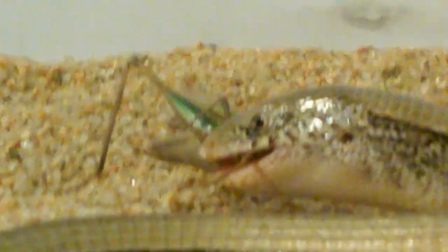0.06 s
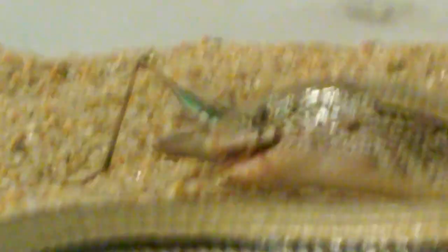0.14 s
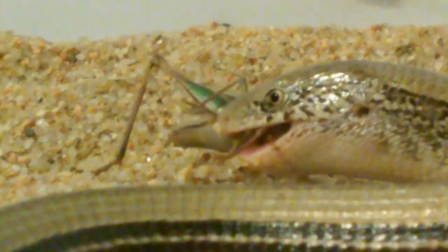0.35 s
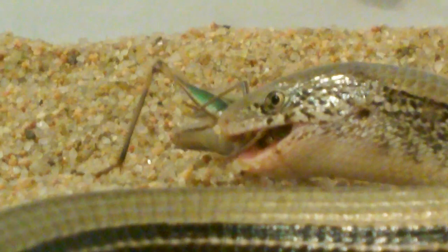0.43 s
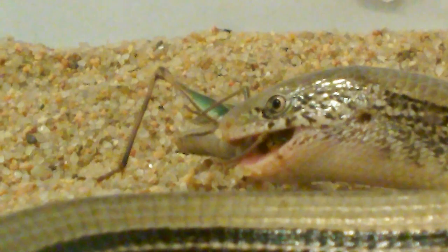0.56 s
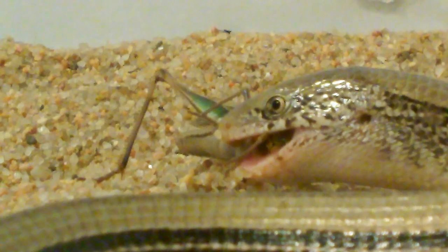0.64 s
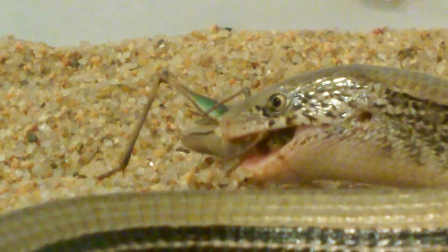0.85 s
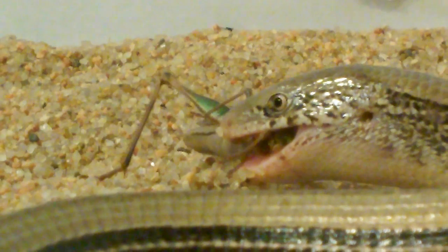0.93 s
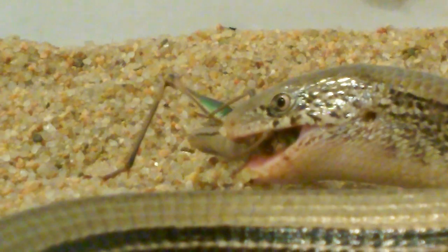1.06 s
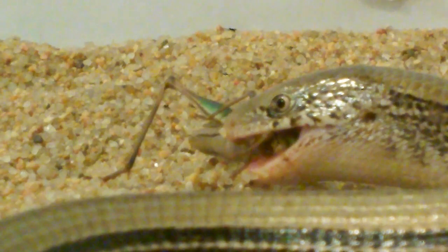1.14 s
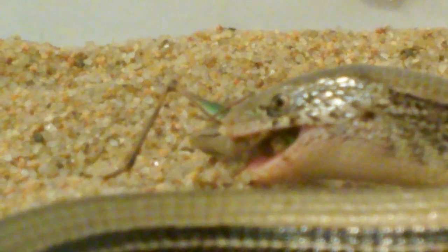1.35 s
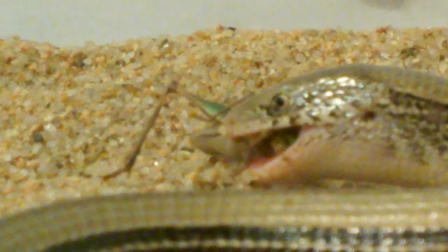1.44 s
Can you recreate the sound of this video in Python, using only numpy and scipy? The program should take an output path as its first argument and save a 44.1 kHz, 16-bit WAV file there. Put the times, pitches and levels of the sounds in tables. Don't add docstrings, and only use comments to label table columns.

```python
import sys
import numpy as np
from scipy import signal
from scipy.fft import rfft, irfft
from scipy.io import wavfile
from scipy.ndimage import uniform_filter1d

SR = 44100
rng = np.random.default_rng(int(sys.argv[2]) if len(sys.argv) > 2 else 0)


def rack_gain(trim_db):
    fader = np.asarray(trim_db, float)
    return 10 ** (fader / 20)


def waveform_to_disk(signal):
    frames = np.transpose(np.atleast_2d(signal))
    scaled = np.clip(frames, -1, 1) * 32767
    samples = np.round(scaled).astype(np.int16)
    wavfile.write(sys.argv[1], SR, samples)


N = 66150

# (time [s], level [dB])
SCRAPE_FORCE = [
    (.2285, -53.5),
    (.2295, -25.5),
    (.236, -17.5),
    (.245, -11.5),
    (.268, -9.5),
    (.29, -16),
    (.299, -30.5),
    (.3015, -51.5),
]
# (frequency [Hz], level [dB])
SCRAPE_COLOUR = [(20, -22.5), (70, -14), (125, -8), (400, -13), (480, -17), (620, -13), (1500, -14.5),
                 (5000, -24.5), (16000, -41)]
# (frequency [Hz], width [Hz], level [dB])
SCRAPE_RING = [(136.54, 38, 8), (176.5, 13, -2.5), (266, 57, -4), (398, 50, -3), (603.5, 90, -7.5)]


def scrape():
    body = coloured(grit(), SCRAPE_COLOUR)
    ring = sum(rack_gain(db) * resonate(body, hz, width) for hz, width, db in SCRAPE_RING)
    s, db = np.transpose(SCRAPE_FORCE)
    force = np.interp(np.arange(N) / SR, s, db, left=-140, right=-140)
    return evened(body + ring) * rack_gain(force)


# (frequency [Hz], width [Hz], level [dB])
SHELL = [(570, 250, 5), (1076, 240, 8.5), (2080, 580, 6.5), (3730, 800, 4.5)]
# (frequency [Hz], level [dB], decay t60 [s])
TANK = [(293, -5.5, 0.16), (361, 4.5, 0.03), (428.8, -1.5, .09), (540, -8, 0.16), (677, -6.5, 0.11),
        (920, -12, .13), (1240, -7.5, 0.065)]


def snap(crack_db, bright_db, share, gap_ms):
    k = np.arange(8000) - 8
    second = share * np.sinc(k - gap_ms * SR / 1000) * (abs(k) < 60)
    click = np.sinc(k) + second
    shell = rack_gain(bright_db - 2) * resonate(click, 7720, 6900)
    for i, (hz, width, db) in enumerate(SHELL):
        shell = shell + (-1) ** i * rack_gain(db) * resonate(click, hz, width)
    tank = 0
    for hz, db, t60 in TANK:
        uneven_db = 3.5 * rng.standard_normal()
        tank = tank + knock(db - 28.5 + uneven_db, hz, t60)[:len(k)]
    return rack_gain(crack_db) * (shell / abs(shell).max() + tank)


SNAP_S = [.0772, .1744, .1851, .559, .6503, .7214, .9477, .9648]
# (crack level [dB], brightness [dB], share of the second break [ratio])
SNAPS = [
    (-29, -0.5, .3),
    (-41, 3, 0.14),
    (-37, -0.5, .6),
    (-47, 9, 0.33),
    (-42.5, 1.5, 0.0047),
    (-24.5, 0.5, 0.79),
    (-27.5, -9.5, 0.22),
    (-26, -5, .85),
]
BREAK_GAP_MS = [.32, .39, .9, .3, .16, .039, .125, .68]


def shell_snaps():
    track = np.zeros(N)
    for s, row, gap_ms in zip(SNAP_S, SNAPS, BREAK_GAP_MS):
        add(track, s, snap(*row, gap_ms))
    return track


THUMP_S = [.078, .0785, .0795, .175, .186, .651, .722, .7235, .9483, .9488, .9657, .9668, .972]
# (pitch [Hz], level [dB], decay t60 [s])
THUMPS = [(491, -38.5, 0.022), (172, -49.5, .06), (350, -53.5, 0.18), (606.5, -45, .02), (120, -40, 0.026),
          (250, -70, .025), (233, -28.5, 0.031), (144, -42.5, 0.022), (2230, -31.5, 0.0059),
          (158, -25.5, 0.021), (1020, -25, 0.0093), (219, -32, 0.015), (460, -59.5, 0.074)]


def tank_thumps():
    track = np.zeros(N)
    for s, (hz, db, t60) in zip(THUMP_S, THUMPS):
        add(track, s, knock(db, hz, t60))
    return track


# (time [s], length [s], level [dB], edge [s], grain pitch [ratio])
STROKES = [
    (0.087, 0.026, -67.5, 0.01, 0.27),
    (0.104, .022, -68.5, 0.017, 1.3),
    (0.198, 0.024, -55.5, 0.019, 1.1),
    (0.314, 0.039, -43.5, 0.013, 0.87),
    (0.37, 0.081, -45, 0.022, 0.95),
    (0.491, 0.074, -71, 0.044, 1.05),
    (0.648, 0.039, -61, 0.039, 0.85),
    (0.978, .02, -70.5, 0.058, 0.34),
    (1.116, 0.03, -84, .02, 0.9),
    (1.272, .015, -80.5, .01, 0.53),
]


def drag():
    gains = [stroke_pressure(*stroke[:4]) for stroke in STROKES]
    grains = grit()
    rubbing = sum(gain * grainy_rub(grains, stroke[-1]) for gain, stroke in zip(gains, STROKES))
    patchy = rack_gain(1.4 * wander(200))
    low = evened(resonate(resonate(rng.standard_normal(N), 55, 120), 55, 200))
    fizz = evened(signal.lfilter(*signal.butter(2, 5970, "high", fs=SR), rng.standard_normal(N)))
    push_db = 20 * np.log10(sum(gains) + 1e-5)
    rumble_db = -23 + 0.75 * linger(push_db, fall_db_per_s=200.5)
    fizz_db = -32 + 0.7 * linger(push_db, fall_db_per_s=109)
    return patchy * rubbing + rack_gain(rumble_db) * low + rack_gain(fizz_db) * fizz


def stroke_pressure(start, length, db, edge):
    t = np.arange(N) / SR
    outside = np.minimum(np.minimum(t - start, start + length - t), 0)
    return rack_gain(db + 20 * outside / edge)


# (frequency [Hz], width [Hz], level [dB])
RUB = [(397, 330, 5.5), (1077.7, 600, 1), (1550, 600, -4), (2070, 700, 1.5), (2870, 590, -9.5),
       (3900, 970, -17.5)]


def grainy_rub(grains, pitch):
    bed = 0
    for i, (hz, width, db) in enumerate(RUB):
        once = resonate(grains, hz * pitch, width * pitch)
        bed = bed + (-1) ** i * rack_gain(db) * resonate(once, hz * pitch, width * pitch)
    return evened(signal.lfilter(*signal.butter(2, 8700 * pitch, fs=SR), bed))


# (time [s], level [dB], pitch [Hz], decay t60 [s])
KNOCKS = [(0.2, -24, 115, 0.01), (0.208, -39, 76, 0.12), (.224, -25.5, 85, 0.011), (0.2, -42, 140, .035),
          (.45, -37, 51, 0.036), (.538, -65, 47, 0.05), (0.48, -62.5, 176, 0.015),
          (0.587, -52.5, 1580, 0.022), (.585, -50, 600, 0.025), (.728, -63, 150, 0.082),
          (0.71, -63, 172, 0.31), (1.156, -71.5, 355, 0.16), (.975, -53.5, 380, 0.14),
          (0.46, -52.5, 171, 0.11), (.558, -52, 73, .06), (0.79, -58, 93, .08), (0.96, -67, 85, 0.11),
          (1.27, -73, 1300, .015), (0.597, -65, 82, .05), (1.041, -60.5, 360, 0.039),
          (1.059, -51, 820, 0.012), (1.077, -51.5, 800, 0.01), (1.156, -56, 823, 0.011)]


def dull_knocks():
    track = np.zeros(N)
    for s, db, hz, t60 in KNOCKS:
        add(track, s, knock(db, hz, t60))
    return track


# (frequency [Hz], level [dB])
HISS_COLOUR = [(25, -13.5), (70, -10), (140, -20), (330, -12), (700, -14.5), (1200, -19), (4000, -22.5),
               (16000, -23)]
# (frequency [Hz], level [dB rms])
HUM = [(177.6, -78), (242.2, -78.5), (301.5, -96), (419.9, -97), (538.3, -98.5), (721.4, -101.5)]


def room():
    t = np.arange(N) / SR
    hum = 0
    for hz, db in HUM:
        waver = rack_gain(1.5 * wander(3000) - 5)
        hum = hum + np.sqrt(2) * rack_gain(db) * waver * np.sin(2 * np.pi * (hz * t + rng.random()))
    return rack_gain(-76.5) * coloured(rng.standard_normal(N), HISS_COLOUR) + hum


def grit():
    size = rack_gain(2.5 * np.minimum(rng.exponential(1, N), 4))
    return evened(size * rng.standard_normal(N) * (rng.random(N) < 14000 / SR))


def knock(db, hz, t60):
    t = np.arange(0, .2, 1 / SR)
    rise = 1 - np.exp(-t / 0.00024)
    return rack_gain(db - 60 * t / t60) * rise * np.sin(2 * np.pi * hz * t)


def linger(db, fall_db_per_s):
    fall = np.arange(N) * fall_db_per_s / SR
    return np.maximum.accumulate(db + fall) - fall


def wander(size):
    return evened(uniform_filter1d(rng.standard_normal(N), size=size))


def poles(hz, width):
    r = np.exp(-np.pi * abs(width) / SR)
    return np.array([1, -2 * r * np.cos(2 * np.pi * hz / SR), r * r])


def resonate(x, hz, width):
    a = poles(hz, width)
    return signal.lfilter(np.array([1, 0, -1]) * (1 - a[2]) / 2, a, x)


def coloured(x, points):
    f, db = np.transpose(points)
    hz = np.fft.rfftfreq(len(x), 1 / SR)
    gain = rack_gain(np.interp(np.log(hz + 1), np.log(f + 1), db))
    return evened(irfft(rfft(x) * gain, len(x)))


def evened(x):
    return x / np.sqrt(np.mean(x ** 2) + 1e-20)


def add(mix, s, sound):
    part = mix[round(s * SR):][:len(sound)]
    part += sound[:len(part)]


def scene():
    noisy = signal.oaconvolve(scrape() + drag() + room(), signal.firwin(255, 15800, fs=SR), "same")
    mix = noisy + shell_snaps() + tank_thumps() + dull_knocks()
    return mix[None]


# (frequency [Hz], width [Hz])
SMEAR = [(4000, 3000), (3900, 1200), (4320, 1500), (4024, 100)]


def microphone(x):
    for hz, width in SMEAR:
        a = poles(hz, width)
        x = signal.lfilter(a[::-1], a, x)
    overloaded = 1.271 * np.tanh(x / 1.15)
    return signal.oaconvolve(overloaded, signal.firwin(255, 16600, fs=SR)[None], "same") - 0.0003


def band_limit(x):
    return signal.sosfilt(signal.butter(12, 16860, fs=SR, output="sos"), x)


def record(dry):
    finished = microphone(dry)
    return band_limit(finished)


dry = scene()
out = record(dry)
waveform_to_disk(out)
```